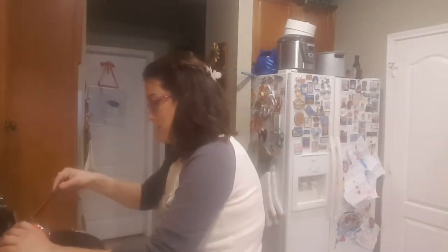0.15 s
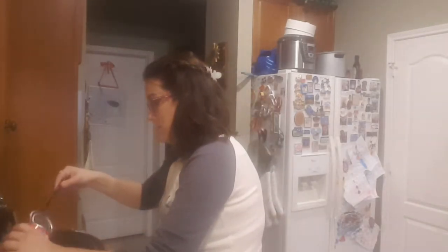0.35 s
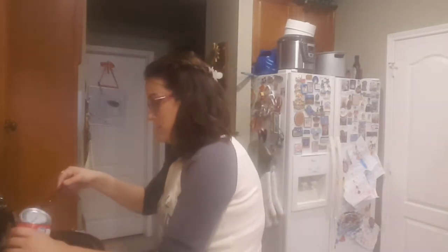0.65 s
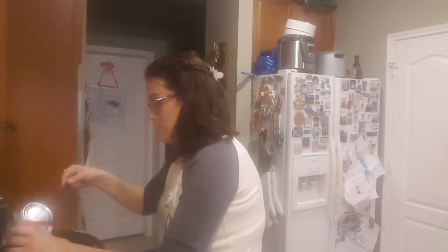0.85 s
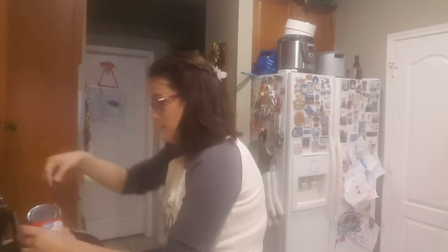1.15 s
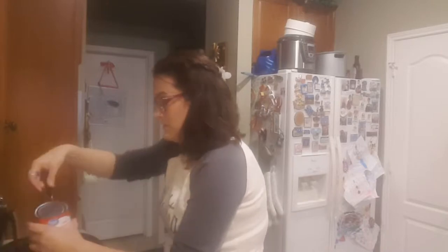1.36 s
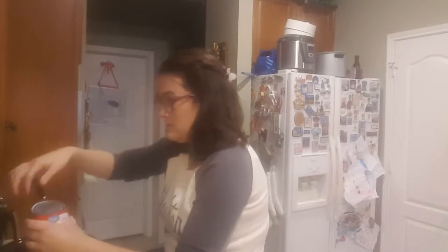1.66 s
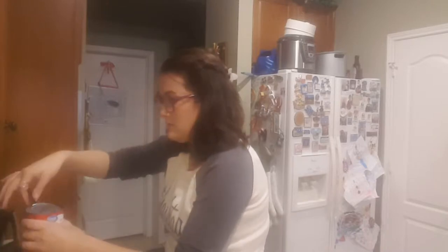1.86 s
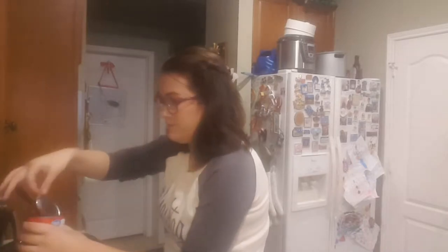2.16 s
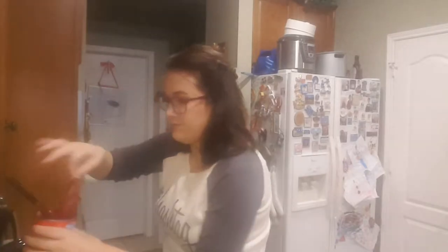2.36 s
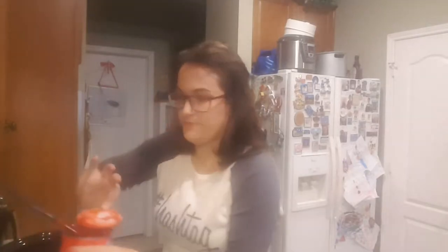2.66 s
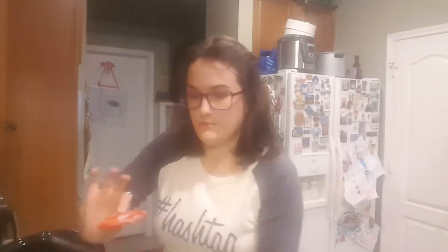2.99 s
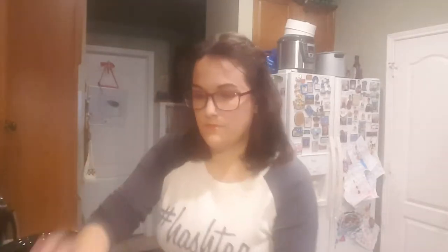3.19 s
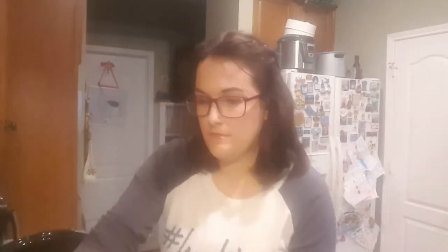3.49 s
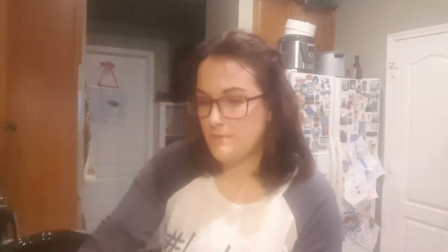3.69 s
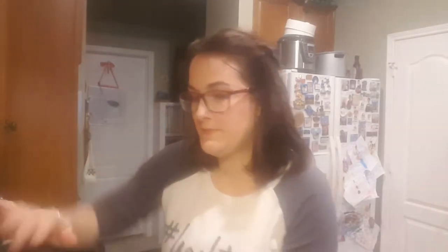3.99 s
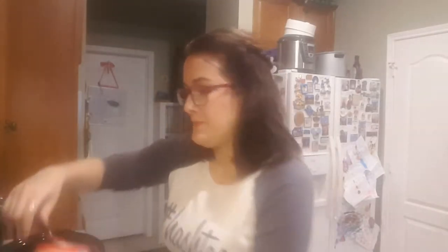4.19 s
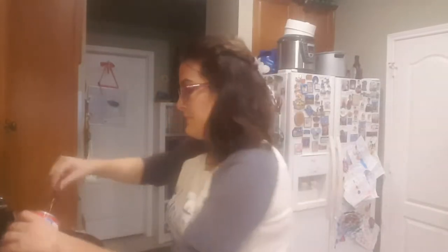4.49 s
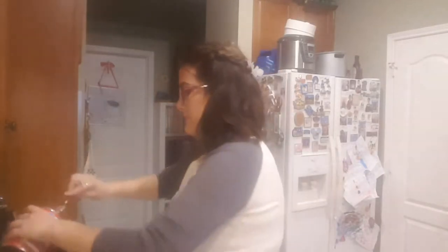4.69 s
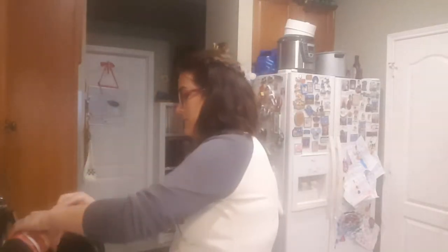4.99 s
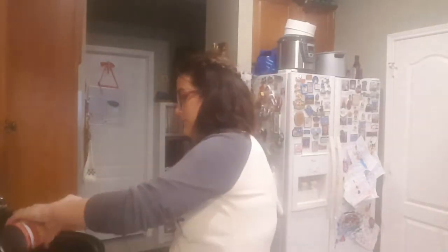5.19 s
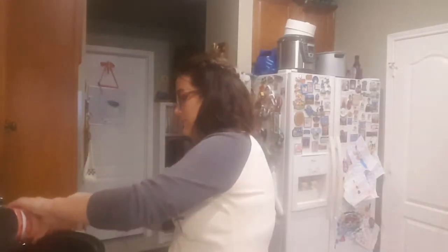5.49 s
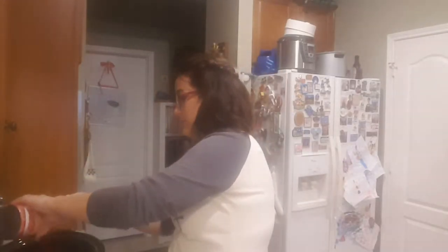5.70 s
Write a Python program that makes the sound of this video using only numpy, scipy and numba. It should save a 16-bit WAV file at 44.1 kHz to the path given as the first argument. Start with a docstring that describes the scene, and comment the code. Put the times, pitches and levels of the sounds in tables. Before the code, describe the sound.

A domestic kitchen with a steady low fridge hum and soft airy hiss, heard closely in stereo on a phone. From 0 to about 1.45 seconds a spoon scrapes inside a thin tin can: uneven short strokes, squeaky and ringing in the mid-high range, with a sharp tick near 0.2 and a weaker spell around 0.9 before stronger strokes at 1.15-1.35. A small tick comes at 1.6, faint scrapes around 2.05-2.15 and tiny ticks near 2.6. Near-quiet follows until light can touches at 3.6, then a loud, hollow, thuddy tin knock on the counter at 3.8, its ring dying quickly in a short room tail. Soft dull hand rubbing comes at 4.5 and 4.7. A crisp tick at 4.9 begins weaker, broader scraping of a fuller can, with ticks near 5.2, a pause, and three clearer quick scrapes at 5.65-5.8.

```python
"""A kitchen heard through a phone's two microphone ports, with a humming fridge and soft air noise throughout.
First a spoon scrapes out a tin can: dense random clicks make the metal wall and the air inside ring.
The empty can is touched down and then set hard on the counter: rough pushes thud, and fading sine tones ring.
Hands shuffle softly in dull noise, then a second, fuller can is scraped over the cooker pot.
Light ticks, made of short noise bursts, fall between; a short noise tail gives the room's ring."""
import sys
import numpy as np
from scipy import signal
from scipy.fft import rfft, irfft
from scipy.io import wavfile
from scipy.ndimage import uniform_filter1d
from numba import njit

SR = 44100
rng = np.random.default_rng(int(sys.argv[2]) if len(sys.argv) > 2 else 0)


def dump(signal):
    """Clip the signal to [-1, 1] and save it as 16-bit WAV at the path in sys.argv[1]."""
    limited = np.clip(np.atleast_2d(signal).T, -1, 1)
    pcm = np.round(limited * 32767).astype(np.int16)
    wavfile.write(sys.argv[1], SR, pcm)


N = 257984  # length in samples

# Spoon strokes: start t/s, rise t/s, hold t/s, wall level/dB, air column level/dB, rasp level/dB,
# hiss level/dB, wall ring f/Hz, air column f/Hz
SPOON_STROKES = [(-0.03, 0.022, 0.048, -51.5, -46.5, -90, -94, 1716, 1240),
                 (0.139, 0.044, 0.054, -54.5, -62, -57.5, -76, 1886, 1190),
                 (0.335, 0.023, .02, -60.5, -69, -79.5, -82, 1830, 1200),
                 (0.408, 0.024, 0.021, -56.5, -64, -67.5, -67.5, 1794, 1280),
                 (0.46, 0.016, 0.049, -54, -63, -64.5, -64, 1805, 1300),
                 (0.605, 0.054, 0.071, -59, -68, -73.5, -73.5, 1867, 1280),
                 (0.748, 0.022, 0.056, -63, -72, -72, -94, 1884, 1070),
                 (0.915, 0.028, 0.084, -75, -76, -86, -92, 1810, 1060),
                 (1.06, 0.036, 0.016, -63.5, -73, -77, -90, 1852, 1070),
                 (1.151, 0.047, 0.034, -55, -62, -72, -83, 1870, 1100),
                 (1.233, 0.023, 0.054, -49, -66.5, -69.5, -92, 1847, 1170),
                 (1.322, 0.011, 0.03, -56.5, -68, -65, -76, 1910, 1170),
                 (2.047, 0.011, 0.061, -68.5, -75, -79, -99, 1980, 1060),
                 (2.103, 0.019, 0.061, -74, -72, -73, -89, 1830, 1040),
                 (2.582, 0.021, 0.044, -77, -84, -83.5, -94, 1900, 1030),
                 (4.901, 0.0081, 0.1, -66.5, -67.5, -69, -68.5, 2020, 1140),
                 (5.034, 0.063, 0.074, -70, -78, -73.5, -76, 1900, 1100),
                 (5.184, 0.022, .13, -80.5, -65.5, -77, -83, 1700, 1300),
                 (5.655, 0.014, 0.04, -59, -68.5, -73, -68.5, 2020, 1300),
                 (5.7, 0.022, 0.037, -66, -62, -61.5, -64.5, 2030, 1300),
                 (5.763, 0.027, 0.028, -63, -56.5, -68, -66, 2180, 1050)]
# Upper ringing tones of each scraped can: centre f/Hz, width f/Hz, level/dB
FIRST_CAN_MODES = [(2360, 110, -1.5), (2753, 92, -5), (2984, 83, -4.5), (3620, 140, -15), (4126, 200, -13),
                   (5600, 160, -15), (8050, 210, -17)]
SECOND_CAN_MODES = [(2786, 550, -23), (3800, 590, -9.5)]
# Empty can meeting the counter: start t/s, crack level/dB, hollow ring level/dB, thud level/dB,
# time for the push to fall by 60 dB t/s
COUNTER_KNOCKS = [(3.589, -55, -53, -17, 0.026), (3.603, -48.5, -64.5, -20, 0.023),
                  (3.63, -50, -61.5, -20, 0.01), (3.672, -51, -67.5, -30.5, 0.026),
                  (3.811, -11.5, -16.5, 2, 0.025), (3.822, -28.5, -16, -4, 0.023),
                  (3.834, -35, -22, -9.5, 0.034), (3.858, -37.5, -23, -16.5, 0.099),
                  (4.175, -68, -70.5, -40.5, 0.2)]
# Ringing tones of the empty can: f/Hz, level/dB, time to fall by 60 dB t/s
EMPTY_CAN_MODES = [(504, -13, .08), (543.6, -2.5, 0.098), (603, 1, 0.1), (659, -3, 0.16),
                   (675.7, 2.5, 0.23), (701, -7.5, 0.22), (736.5, -11, .15), (760, -9.5, 0.15),
                   (939, -20.5, 0.21), (1060, -8, .05), (1109, 0.5, 0.044), (1255, -14, 0.1),
                   (1363, -22, 0.34), (1382.3, -4.5, 0.28), (1365, -11.5, 0.25), (1436, -8.5, 0.089),
                   (1658, -15, 0.23), (1868, -3.5, 0.057), (2220, -19, .06), (3458, -12, 0.042),
                   (4240, -10, 0.026), (5560, -17.5, .015)]
# Light ticks of spoon and fingers: start t/s, burst level/dB, centre f/Hz, knock level over burst level/dB,
# time to fall by 60 dB t/s
LIGHT_TICKS = [(.209, -34.5, 2930, 13, 0.025), (.955, -61.5, 11000, -23.5, .05),
               (1.35, -50, 4970, 17, 0.035), (1.619, -51, 4140, 11.5, 0.1), (2.553, -59, 4200, 9.5, 0.12),
               (2.671, -58, 2960, 11, 0.1), (4.913, -34.5, 4700, 12.5, 0.015),
               (5.111, -55, 8500, -21.5, 0.028), (5.187, -51, 3990, 20, 0.036),
               (5.233, -43, 3850, 16, 0.043), (5.452, -62, 12750, -25.5, 0.073)]
# Soft shuffles of hands on the tin: start t/s, rise t/s, hold t/s, level/dB
HAND_SHUFFLES = [(4.528, 0.031, 0.038, -65), (4.69, 0.029, 0.013, -68)]
# Bands of the room tail: centre f/Hz, time to fall by 60 dB t/s, level/dB
ROOM_BANDS = [(324, 0.33, -2.5), (700, 0.57, 5), (1580, 0.35, 3.5), (2537, 0.49, 1.5), (5150, 0.48, -2),
              (11000, 0.17, 2)]
# Steady lines of the fridge: f/Hz, level/dB
FRIDGE_LINES = [(25.5, -90), (59.3, -66), (103, -65), (119.5, -57), (248, -82.5), (414, -72), (8468, -100)]
# Air resonances in the room: centre f/Hz, width f/Hz, level/dB
AIR_RESONANCES = [(92, 6.4, -67.5), (113, 9, -61), (126.1, 79, -64.5), (175.1, 31, -60.5), (351.5, 30, -66),
                  (451, 67, -69)]
# Shape of the background noise: f/Hz, relative level/dB per Hz
AIR_SHAPE = [(30, -10), (60, -0.5), (200, -7), (300, -6), (420, -12.5), (510, -13), (660, -9), (1150, -18),
             (2300, -24), (4300, -31.5), (8500, -38), (10000, -39.5), (12500, -35.5), (15800, -34.5)]
# How alike the background is at left and right: f/Hz, likeness (1 = same; below 0 is used as 0)
PORT_LIKENESS = [(60, 0.9), (130, 0.33), (290, 0.41), (640, 0.66), (1410, 1), (3100, -0.02), (6820, -0.27),
                 (15000, 0.44)]

SECOND_CAN_S = 4.0  # strokes that start after this time scrape the second can
RISE_DB, RELEASE_DB_PER_S = 20, 325  # a stroke climbs this far over its rise, then falls at this rate
PRESSURE_DB, PITCH_WANDER = 1.3, 0.005  # unevenness of the hand (dB, share of the pitch)
MODE_WANDER_DB = 3.5  # how far the upper tones come and go
MODE_DRIFT = 0.015  # share of the pitch by which they slide as the hand turns the tin
FIRST_WALL_WIDTH_HZ = 75  # narrow, for the thin squeak of the first tin
RASP_HZ, RASP_WIDTH_HZ, RASP_DB = 2600, 2400, -5  # broad body of the rasp
SIZZLE_HZ, SIZZLE_DB = 13000, -13  # top of the hiss
SCRAPE_WET_DB = -6  # how much scraping goes to the room
ROOM_ALIKE_HZ = 500  # well under this the tail is nearly the same at both ports
HUM_WAVER_DB = 1.5
AIR_DB = -61.5
SHADE_HZ, SHADE_WIDTH_HZ, SHADE = 10300, 2500, 0.65  # the phone's edge shades this band by this share
PORT_HZ, PORT_WIDTH_HZ, PORT_DB = 8500, 900, -1  # the microphone port rings here; level of the added band
TOP_HZ = 15850  # the phone cuts steeply above this


def scrape(strokes, can_modes, wall_width_hz, column_width_hz):
    """The spoon edge slips in uneven clicks; wall and air ring at pitches that move with spoon and food."""
    t = np.arange(N) / SR
    slips = rng.standard_normal(N) * undb(2.66 * rng.exponential(size=N))
    slips = slips * undb(0.7 * walk(60))
    start, rise, hold, *part_dbs, wall_hz, column_hz = np.transpose(strokes)
    middle = start + rise + hold / 2
    wall_hz = np.interp(t, middle, wall_hz) * (1 + PITCH_WANDER * walk(24.1))
    column_hz = np.interp(t, middle, column_hz) * (1 + PITCH_WANDER * walk(24.1))

    wall = glide(slips, wall_hz, 1.0 * wall_width_hz)
    wall = level(glide(wall, wall_hz, 8.7 * wall_width_hz), 0)
    column = level(glide(slips, column_hz, 1.0 * column_width_hz), 0)
    column = column + level(band_twice(slips, 650, 120), -9)  # lowest resonance of the air in the can

    rasp = level(band_twice(slips, RASP_HZ, RASP_WIDTH_HZ), RASP_DB)
    # the upper tones come and go as the contact point wanders
    for hz, width, db in can_modes:
        mode = glide(slips, hz * (1 + MODE_DRIFT * walk(6.26)), 1.0 * width)
        rasp = rasp + level(mode, db) * undb(MODE_WANDER_DB * walk(27.08))
    hiss = level(band(slips, 6300, 12000), 0) + level(band(slips, SIZZLE_HZ, 5000), SIZZLE_DB)

    # add up all strokes into one moving gain for each part
    gains = undb(part_dbs) @ np.array([envelope(*row[:3]) for row in strokes])
    parts = (wall, column, rasp, hiss)
    return sum(part * gain * undb(PRESSURE_DB * walk(40)) for part, gain in zip(parts, gains))


def knocks():
    """Each contact is a rough push that cracks and thuds in the counter and makes the empty can ring."""
    t = np.arange(SR // 2) / SR
    blow, ring = np.zeros((2, N + len(t)))
    modes = np.zeros(len(t))
    for hz, db, t60 in EMPTY_CAN_MODES:
        swell = 1 - np.exp(-hz * t / 4)  # takes some cycles, so low tones come late
        modes += undb(db) * np.sin(2 * np.pi * hz * t) * decay(t, t60) * swell
    for s, crack_db, hollow_db, thud_db, contact in COUNTER_KNOCKS:
        push = rng.standard_normal(len(t)) * (1 - np.exp(-t / 0.00096)) * decay(t, contact)
        crack = band(band(push, 2400, 7700), 1700, 7000)
        thud = band_twice(push, 480, 490)
        thud = thud + undb(-9) * band(push, 1100, 660) + undb(-6) * band(push, 150, 170)
        i = int(s * SR)
        blow[i:i + len(t)] += undb(crack_db) * crack + undb(thud_db) * thud
        ring[i:i + len(t)] += undb(hollow_db) * modes
    return blow[:N], ring[:N]


def ticks():
    """Short contacts: a noise burst around its own centre and a knock in the tin around 1280 Hz."""
    t = np.arange(SR // 8) / SR
    out = np.zeros(N + len(t))
    for s, db, hz, knock_db, t60 in LIGHT_TICKS:
        burst = rng.standard_normal(len(t)) * decay(t, t60) * (1 - np.exp(-t / 0.0021))
        knock = band_twice(burst, 1280, 930)
        bright = band_twice(burst, hz, 0.49 * hz)
        i = int(s * SR)
        out[i:i + len(t)] += undb(db) * (bright + undb(knock_db) * knock)
    return out[:N]


def hands():
    """Skin rubbing the tin as the second can is picked up: dull, uneven noise in soft shuffles."""
    rub = band(band(rng.standard_normal(N), 680, 560), 640, 500)
    rub = level(rub * undb(3 * walk(30)), 0)
    return rub * sum(undb(db) * envelope(s, rise, hold) for s, rise, hold, db in HAND_SHUFFLES)


def room(x):
    """Diffuse tail: noise builds quickly and each band dies at its own pace; the bass is alike at both ports."""
    t = np.arange(SR * 2 // 3) / SR
    mid, side = np.zeros((2, len(t)))
    for hz, t60, db in ROOM_BANDS:
        noise = band_twice(rng.standard_normal((2, len(t))), hz, hz) * decay(t, t60) * undb(db)
        mid, side = mid + noise[0], side + noise[1]
    side = highpass(side, ROOM_ALIKE_HZ)
    tail = np.array([mid + side, mid - side]) * (1 - np.exp(-t / 0.00079))
    return signal.fftconvolve(x[None], tail / np.sqrt(np.sum(tail ** 2) / 2))[:, :N]


def fridge():
    """Motor lines waver a little, and air noise swells in the low resonances of the room."""
    t = np.arange(N) / SR
    hum = np.zeros(N)
    for hz, db in FRIDGE_LINES:
        line = np.sin(2 * np.pi * (hz * t + rng.random() + 0.07 * walk(1.6)))
        hum += level(line, db) * undb(HUM_WAVER_DB * walk(4.006))
    for hz, width, db in AIR_RESONANCES:
        hum += level(band_twice(rng.standard_normal(N), hz, width), db)
    return place(hum, -1.8, 0.0002, -60)


def air():
    """Broad background noise, shaped by pitch; each pitch range is more or less alike at the two ports."""
    log_hz = np.log(np.maximum(np.arange(N // 2 + 1) * SR / N, 1))
    shape_hz, shape_db = np.transpose(AIR_SHAPE)
    like_hz, likeness = np.transpose(PORT_LIKENESS)
    shape = undb(np.interp(log_hz, np.log(shape_hz), shape_db))
    like = np.clip(np.interp(log_hz, np.log(like_hz), likeness), 0, 1)
    mid, side = rfft(rng.standard_normal((2, N))) * shape * np.sqrt([1 + like, 1 - like])
    both = irfft(np.array([mid + side, mid - side]), N)
    return level(both, AIR_DB) * undb([[-0.8], [0.8]])


def place(x, pan_db, lag_s, scatter_db):
    """Two ports: a level difference, a lag at the left one, unlike reflections off counter, pot and wall."""
    t = np.arange(SR // 30) / SR
    early = highpass(rng.standard_normal((2, len(t))) * decay(t, 0.032), 700)
    early = early / np.sqrt(np.sum(early ** 2, axis=1, keepdims=True))
    reflected = signal.fftconvolve(x[None], early)[:, :N]
    direct = np.array([np.roll(x, round(lag_s * SR)), x])
    return (direct + undb(scatter_db) * reflected) * undb([[pan_db / 2], [-pan_db / 2]])


def envelope(start, rise, hold):
    """Gain of one stroke: climb, hold, steady fall in dB."""
    t = np.arange(N) / SR - start
    climb_db = RISE_DB * (t / max(rise, 0.003) - 1)
    fall_db = -RELEASE_DB_PER_S * (t - rise - hold)
    return undb(np.minimum(climb_db, np.minimum(0, fall_db)))


def walk(rate):
    """Random wander: levels held for 1 / rate seconds, smoothed twice; spread near 1."""
    k = int(SR / rate)
    steps = np.repeat(rng.standard_normal(N // k + 1), k)
    return 1.73 * uniform_filter1d(uniform_filter1d(steps, k), k)[:N]


@njit
def glide(x, hz, width):
    """Resonant band-pass (state-variable filter) whose centre moves every sample."""
    y, b, l = np.empty(len(x)), 0., 0.  # b and l: the filter's band and low memories
    for i in range(len(x)):
        g, k = np.tan(np.pi * hz[i] / SR), width / hz[i]
        v = (b + g * (x[i] - l)) / (1 + g * (g + k))
        b, l, y[i] = 2 * v - b, l + 2 * g * v, k * v
    return y


def band(x, hz, width):
    """Resonant band-pass, gain 1 at the centre."""
    return signal.lfilter(*signal.iirpeak(min(hz, 0.45 * SR), hz / width, fs=SR), x)


def band_twice(x, hz, width):
    """The same band-pass used twice, for steeper sides."""
    return band(band(x, hz, width), hz, width)


def highpass(x, hz):
    """Gentle filter that weakens what lies below hz."""
    return signal.lfilter(*signal.butter(1, hz, "high", fs=SR), x)


def decay(t, t60):
    """Fading gain that falls by 60 dB in t60 seconds."""
    return 1000. ** (-t / t60)


def undb(db):
    """Gain of a level in dB."""
    return 10 ** (np.asarray(db) / 20)


def level(x, db):
    """Scale to an rms (root-mean-square) level in dB."""
    return x * undb(db) / np.sqrt(np.mean(x ** 2))


def scene():
    """Near sources at their places, their common room tail, and the background."""
    first_strokes = [row for row in SPOON_STROKES if row[0] < SECOND_CAN_S]
    second_strokes = [row for row in SPOON_STROKES if row[0] > SECOND_CAN_S]
    first = scrape(first_strokes, FIRST_CAN_MODES, FIRST_WALL_WIDTH_HZ, 130)
    second = scrape(second_strokes, SECOND_CAN_MODES, 590, 200) + hands()
    blow, ring = knocks()
    tick = ticks()
    # left-over-right level in dB, lag in s, reflections in dB
    near = place(first, 0.35, 0.0002, 0.85) + place(second, -0.56, 0.0002, 1.6)
    near = near + place(tick, -1, 0.00024, 1)
    near = near + place(blow, -3.1, 0.00022, 3.1) + place(ring, -2.3, 0.0002, -2)
    to_room = undb(SCRAPE_WET_DB) * (first + second) + undb(-10) * tick
    to_room = to_room + undb(-5.5) * blow + undb(-10.5) * ring
    heard = near + room(to_room)
    shaded = heard - SHADE * band(heard, SHADE_HZ, SHADE_WIDTH_HZ)
    return shaded + fridge() + air()


def record(dry):
    """The port lifts a treble band; the phone drops deep bass and cuts the top steeply."""
    lifted = dry + undb(PORT_DB) * band(dry, PORT_HZ, PORT_WIDTH_HZ)
    thin = highpass(lifted, 20)
    return signal.sosfilt(signal.ellip(10, 0.2, 80, TOP_HZ, fs=SR, output="sos"), thin)


dry = scene()
out = record(dry)
dump(out)
```